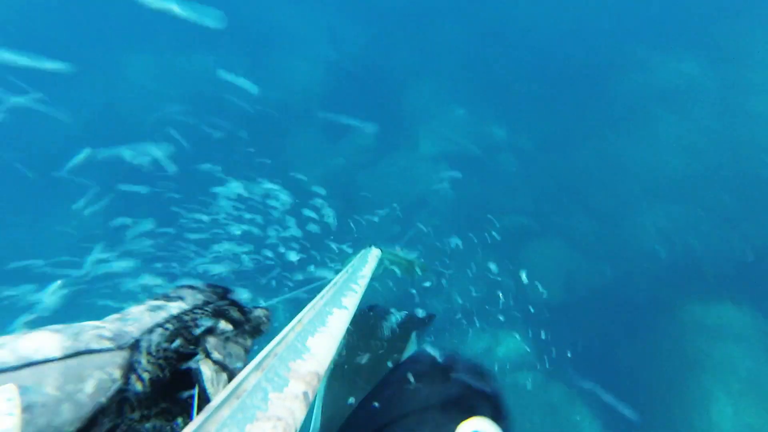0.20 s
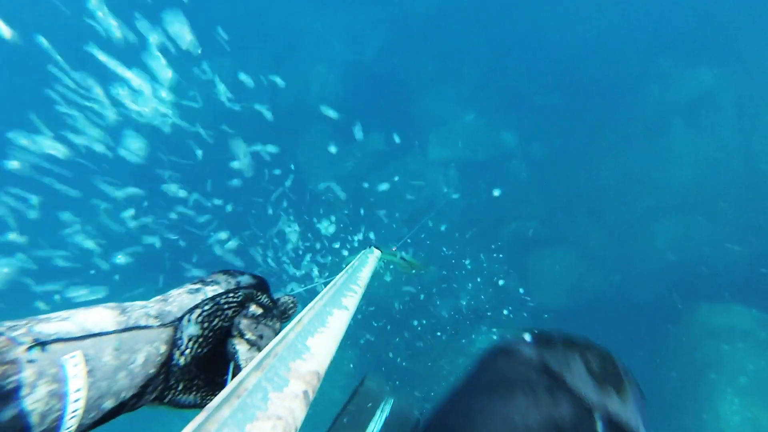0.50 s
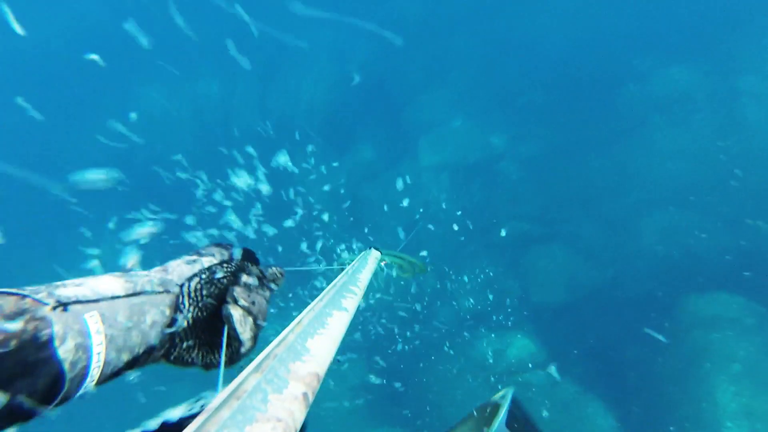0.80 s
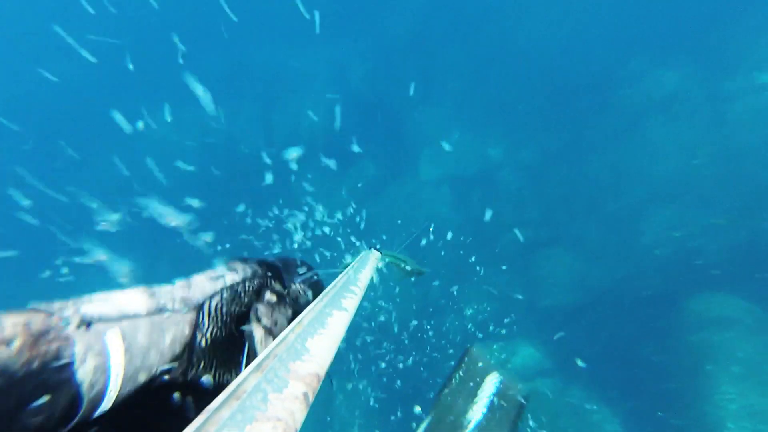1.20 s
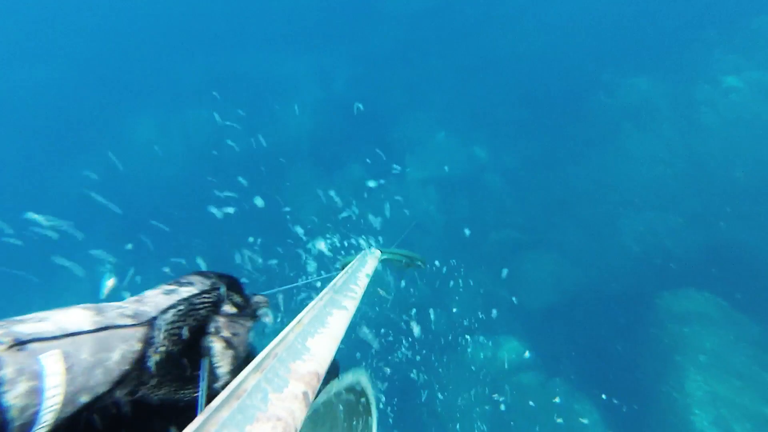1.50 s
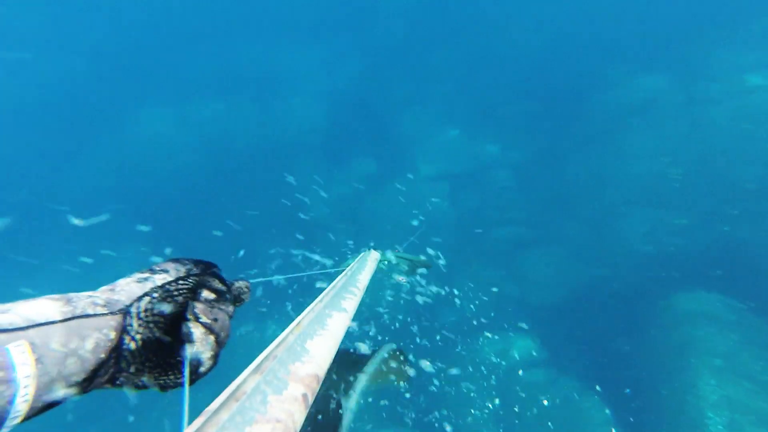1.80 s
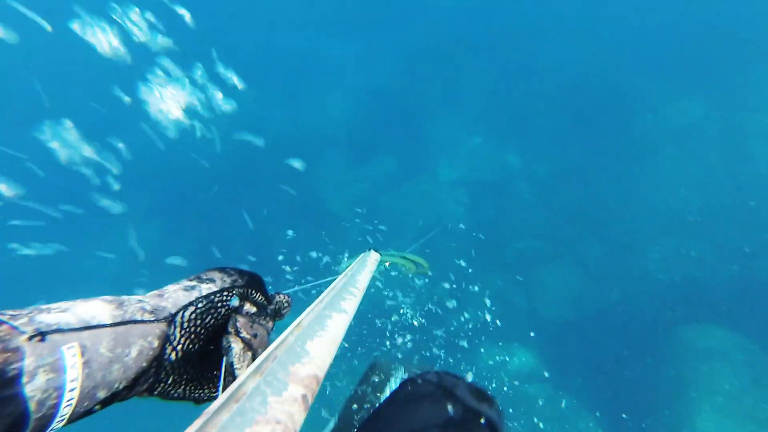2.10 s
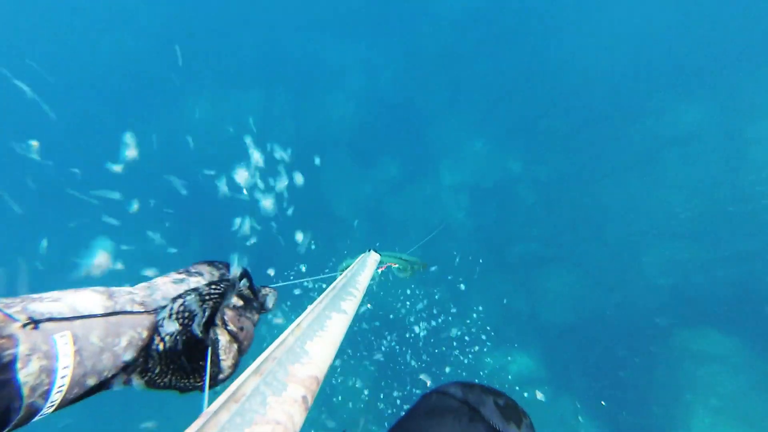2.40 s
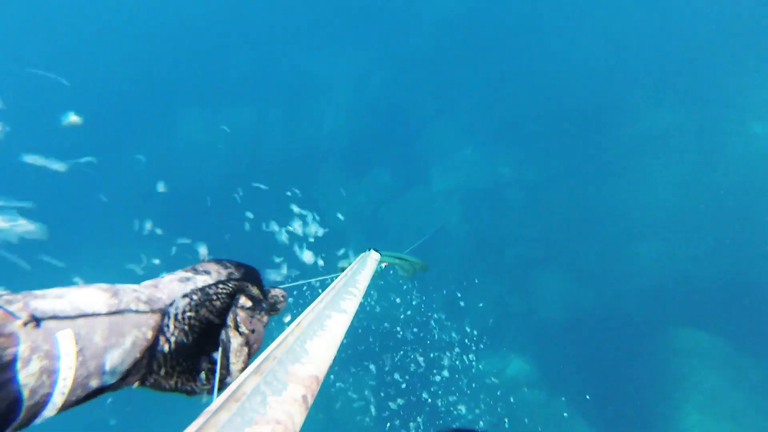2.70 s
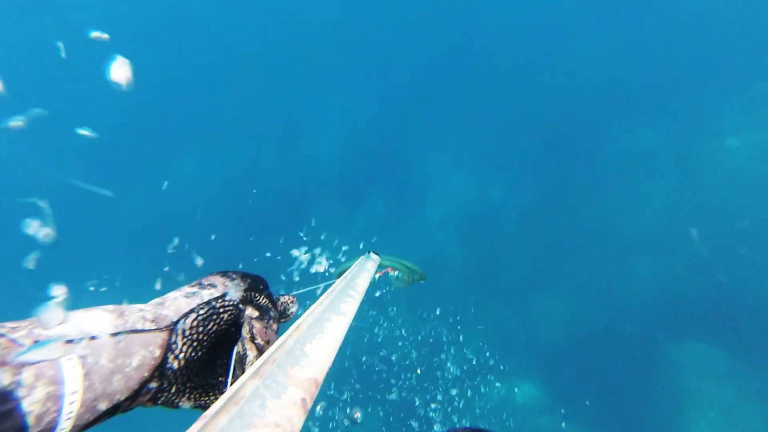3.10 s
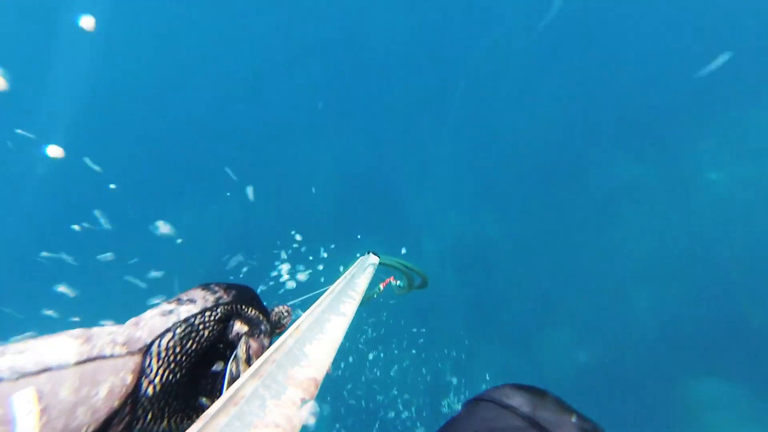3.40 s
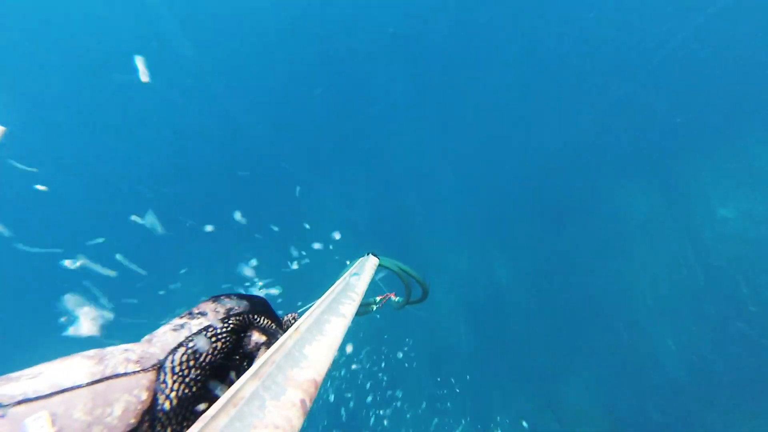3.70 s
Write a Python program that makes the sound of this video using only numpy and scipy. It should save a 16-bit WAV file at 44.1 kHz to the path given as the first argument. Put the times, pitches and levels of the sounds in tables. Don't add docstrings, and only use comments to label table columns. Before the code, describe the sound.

Diver's kicks push pulsing low water rushes past a submerged microphone, with knocks and bubbles

```python
import sys
import numpy as np
from scipy import signal
from scipy.fft import rfft, irfft
from scipy.io import wavfile
from scipy.ndimage import uniform_filter1d

SR = 44100
rng = np.random.default_rng(int(sys.argv[2]) if len(sys.argv) > 2 else 0)


def persist_wave(psi):
    counts = np.round(np.clip(psi, -1, 1) * 32767).astype(np.int16)
    wavfile.write(sys.argv[1], SR, np.atleast_2d(counts).T)


def convert_level_to_amplitude(level_db):
    exponent = np.asarray(level_db, float) / 20
    return 10 ** exponent


N = 167580
TIME = np.arange(N) / SR


def rms_one(x):
    return x / np.sqrt(np.mean(x ** 2) + 1e-20)


def at_hz(points, hz):
    table_hz, values = np.array(points).T
    return np.interp(np.log(hz), np.log(table_hz), values)


def near(s, before, after):
    first = max(int((s - before) * SR), 0)
    last = min(int((s + after) * SR), N)
    k = np.arange(first, last)
    return k, k / SR - s


def drift(rate_hz):
    r = np.exp(-80 * np.pi * rate_hz / SR)
    noise = rng.standard_normal(N // 40 + 2002)
    slow = signal.lfilter([1], [1, -2 * r, r * r], noise)[2000:]
    return np.interp(np.arange(N) / 40, np.arange(len(slow)), rms_one(slow))


def peak(x, hz, width_hz):
    r = np.exp(-np.pi * width_hz / SR)
    feedback = [1, -2 * r * np.cos(2 * np.pi * hz / SR), r * r]
    return signal.lfilter([(1 - r * r) / 2, 0, (r * r - 1) / 2], feedback, x + 1e-18)


def ring(clicks, hz, t60):
    r = convert_level_to_amplitude(-60 / (t60 * SR))
    w = 2 * np.pi * hz / SR
    return signal.lfilter([0, np.sin(w)], [1, -2 * r * np.cos(w), r * r], clicks + 1e-18)


def grains(clicks, low_hz, high_hz, cycles, tilt_db):
    dealt = rng.integers(0, 14, N)
    out = 0
    for k, hz in enumerate(np.geomspace(low_hz, high_hz, num=14)):
        rung = ring(clicks * (dealt == k), hz, cycles / hz)
        narrow = peak(rung, hz, 3.3 * hz / cycles)
        out = out + convert_level_to_amplitude(tilt_db * np.log2(hz / low_hz)) * narrow
    return out


def coloured(spectrum):
    hz = np.maximum(np.fft.rfftfreq(N, 1 / SR), 1)
    white = rng.standard_normal(N)
    return rms_one(irfft(rfft(white) * convert_level_to_amplitude(at_hz(spectrum, hz)), N))


def bands(spectrum, flow, patchy_db, lumps_db):
    out = 0
    together = np.clip(drift(30), -1.5, 1.5)
    edges = 20 * 2 ** np.arange(0, 7.6, 1 / 3)
    white = rng.standard_normal((2, N + SR))
    for k, (low, high) in enumerate(zip(edges, edges[1:])):
        hz = np.sqrt(low * high)
        band_pass = signal.butter(2, [low, high], "band", fs=SR, output="sos")
        band = signal.sosfilt(band_pass, white[k % 2])[SR:]
        lumps = lumps_db * min(hz / 250, 1) * together
        level_db = at_hz(spectrum, hz) + lumps + patchy_db * drift(22.6)
        out = out + band * convert_level_to_amplitude(level_db) * flow(hz)
    return out * np.sqrt(SR / 400)


def push(power):
    # (crest [s], rise [s], fall [s], level [dB])
    kicks = [(.1, .02, 0.057, -58), (0.268, 0.14, 0.21, -40.5), (0.731, 0.17, 0.14, -42),
             (0.871, 0.1, 0.092, -44.5), (1.19, 0.085, 0.2, -39.5), (1.59, .15, 0.23, -40),
             (2.031, 0.23, .14, -40), (2.338, .15, 0.21, -39), (2.59, 0.036, 0.037, -51),
             (2.73, 0.13, 0.15, -38), (2.9, 0.066, 0.097, -47.5), (3.09, 0.13, 0.12, -40),
             (3.249, 0.18, 0.066, -56.5), (3.465, 0.13, 0.11, -43)]
    t = np.arange(0, N + 64, 64) / SR
    force = 0
    for crest, rise, fall, db in kicks:
        part = np.interp(t, [crest - rise, crest, crest + fall], [0, 1, 0])
        force = force + convert_level_to_amplitude(db) * np.sin(np.pi / 2 * part) ** power
    return np.interp(TIME, t, force)


def hiss():
    # (frequency [Hz], level [dB])
    hiss_colour = [(700, -29), (1000, -2.5), (1800, -11.5), (3000, -6.5), (7500, -8.5), (9000, -9.5),
                   (13500, -10.5), (15500, -12)]
    return convert_level_to_amplitude(-77) * coloured(hiss_colour)


def noise_apart():
    # (frequency [Hz], level [dB])
    apart_colour = [(40, 6), (750, 0), (2700, -19), (8000, -15.5), (15000, -24.5)]
    flow = 1 + convert_level_to_amplitude(46.5) * push(1)
    return convert_level_to_amplitude(-86.5) * flow * coloured(apart_colour) * [[1], [-1]]


def whine():
    # (frequency [Hz], level [dB])
    whine_tones = [(13125, -95), (13157, -98)]
    return sum(convert_level_to_amplitude(db + 3) * np.sin(2 * np.pi * hz * TIME) for hz, db in whine_tones)


def swirl():
    # (frequency [Hz], level [dB per Hz])
    swirl_colour = [(25, 8), (120, -2.5), (300, -20.5), (800, -29), (1300, -36), (3000, -47.5)]
    # (time [s], level [dB])
    eddy_levels = [(0, -4), (.2, -2), (.55, 1), (1.05, 5.5), (1.42, 2), (1.85, 1), (2.2, 1), (2.95, 2),
                   (3.35, 1), (3.6, -4), (3.8, -5.5)]
    eddy = convert_level_to_amplitude(np.interp(TIME, *np.transpose(eddy_levels)))
    return convert_level_to_amplitude(-57) * bands(swirl_colour, lambda hz: eddy, patchy_db=3.5, lumps_db=3)


def gurgle(flow):
    born = rng.random(N) < 260 / SR
    size_db = -9.5 + 4.3 * np.minimum(rng.exponential(1, N), 2.2)
    return grains(born * flow * convert_level_to_amplitude(size_db), 259.5, 2190, cycles=11, tilt_db=-7.5)


def near_snaps():
    # (time [s], peak level [dB], frequency [Hz])
    snap_events = [(0.4034, -55, 8400), (0.6184, -51.5, 8700), (0.8243, -50, 10100), (0.859, -47.5, 8460),
                   (0.9399, -52.5, 5400), (0.987, -56, 8390), (1.0202, -54, 6450), (1.08, -59, 7990),
                   (1.1746, -51, 5540), (1.551, -48.5, 7700), (1.8859, -43.5, 6400), (2.004, -53.5, 8410),
                   (2.0129, -51.5, 4400), (2.2452, -55.5, 4600), (2.2753, -53.5, 9980),
                   (2.4606, -54.5, 8030), (2.5813, -50, 7680), (2.644, -61, 6710), (2.6593, -53.5, 6600),
                   (2.6827, -51, 7700), (2.728, -41, 5010), (2.7922, -42, 4800), (2.8131, -49, 8200),
                   (2.8333, -53.5, 7820), (2.9673, -52.5, 8100), (3.048, -56, 4700), (3.0675, -54.5, 6440),
                   (3.1084, -54, 6220), (3.1243, -47.5, 7620), (3.153, -55.5, 4470), (3.273, -54.5, 9950),
                   (3.3429, -58, 8100), (3.4163, -60, 8050), (3.491, -55, 8060), (3.54, -57.5, 8090),
                   (3.6432, -61, 9780)]
    out = np.zeros(N)
    puff = np.exp(-np.arange(900) / (.0014 * SR))
    for s, db, hz in snap_events:
        burst = rng.standard_normal(900) * puff
        octaves = .4 * rng.standard_normal(4) * [0, 1, 1, 1]
        pitches = np.clip(hz * 2 ** octaves, 2800, 10000)
        snap = sum(ring(burst, f, 8 / f) for f in pitches)
        start = int(s * SR)
        out[start:start + 900] += convert_level_to_amplitude(db + 1.5) * snap / np.abs(snap).max()
    return out


def crackle(flow):
    # (frequency [Hz], width [Hz], level [dB])
    shell_modes = [(4950, 300, -1), (6430, 600, -1), (7930, 900, 1), (10000, 900, -4), (12200, 900, -12)]
    chance = 320 * convert_level_to_amplitude(6 * drift(6)) / SR
    far_db = -73 + 3.2 * np.minimum(rng.exponential(1, N), 4)
    far = (rng.random(N) < chance) * convert_level_to_amplitude(far_db)
    out = near_snaps() + grains(far, 1730, 13000, cycles=14, tilt_db=2.33)
    fizz = convert_level_to_amplitude(-27 + 3.0 * drift(57)) * flow * rng.standard_normal(N)
    drive = .5 * out + fizz
    shell = drive / 8
    for k, (hz, width_hz, db) in enumerate(shell_modes):
        shell = shell + (-1) ** k * convert_level_to_amplitude(db) * peak(drive, hz, width_hz)
    high_pass = signal.butter(3, 2500, "high", fs=SR, output="sos")
    return signal.sosfilt(high_pass, out + shell)


def rush():
    # (frequency [Hz], level [dB per Hz])
    rush_colour = [(25, -0.5), (70, -0.5), (200, -8), (800, -15), (1000, -25.5), (1400, -30.5),
                   (2200, -37.5), (2900, -34)]
    # (frequency [Hz], power [1])
    steepness = [(30, 0.71), (300, 0.81), (800, 1.77), (2500, 4)]
    return convert_level_to_amplitude(-3) * bands(rush_colour, lambda hz: push(at_hz(steepness, hz)), patchy_db=3.5, lumps_db=3.0)


def shaft(drive):
    # (frequency [Hz], width [Hz], level [dB])
    shaft_modes = [(155.8, 12.7, 7), (321.5, 32, 3.5), (564, 65, 2), (740, 24.7, 7), (758, 23, -2),
                   (1713, 130, 9.5), (2050, 290, -3), (2273, 32, 7.5)]
    body = drive + sum(convert_level_to_amplitude(db) * peak(drive, hz, width_hz) for hz, width_hz, db in shaft_modes)
    wall = signal.cheby1(5, 1, 2394, fs=SR, output="sos")
    return signal.sosfilt(wall, body)


def knocks():
    # (time [s], peak level [dB], contact frequency [Hz])
    contacts = [(0.0909, -31.5, 430), (0.2793, -13, 2540), (0.957, -39, 900), (1.429, -52, 3300),
                (1.138, -25.5, 780), (2.775, -21, 960), (2.646, -40, 1450)]
    # (frequency [Hz], level [dB], time to fall 60 dB [s])
    housing_modes = [(171, -15, 0.035), (356, -10.5, 0.054), (490, -21, 0.09), (677, -3.5, 0.024),
                     (900, -15.5, 0.0077), (2000, -9.5, 0.011), (3560, -22.5, 0.011)]
    hits = np.zeros(N)
    for s, db, hz in contacts:
        touch = np.hanning(int(SR / hz) + 2)
        start = int(s * SR)
        hits[start:start + len(touch)] -= convert_level_to_amplitude(db) * touch / touch.sum()
    return sum(convert_level_to_amplitude(db) * ring(hits, hz, t60) for hz, db, t60 in housing_modes)


def heave():
    # (centre [s], level [dB], length [s])
    heave_events = [(0.321, -37, 0.23), (0.788, -43, .16), (1.238, -34.5, .15), (1.62, -38, .14),
                    (2.101, -40, 0.2), (2.38, -42, 0.26), (2.8, -42.5, 0.21), (3.142, -38.5, .16),
                    (3.5, -45, .12)]
    out = np.zeros(N)
    for s, db, length in heave_events:
        swell = np.exp(-8 * ((TIME - s) / length) ** 2)
        out += convert_level_to_amplitude(db + 3) * swell * np.sin(2 * np.pi * 18.4 * (TIME - s))
    return out


def locks():
    # (centre [s], length [s], level [dB], frequency [Hz], glide [Hz per s])
    lock_events = [(0.236, 0.022, -42.5, 793, 2000), (0.317, 0.034, -36.5, 780, -3000),
                   (.205, 0.027, -44, 323, 3000), (.25, 0.063, -57, 2000, 6000), (.69, .06, -43, 510, 5000),
                   (.805, 0.048, -42, 450, -7000), (0.654, .08, -41, 320, 0),
                   (0.689, 0.064, -37, 150, -500), (.87, 0.094, -39, 141, -300),
                   (1.16, 0.046, -38, 320.6, 500), (1.3, 0.11, -47.5, 750, -400),
                   (1.685, .08, -36.5, 155, 0), (1.715, 0.026, -42.5, 748, -1000),
                   (1.635, 0.033, -42, 520, -5000), (2.2, .06, -43, 560, 6000), (1.9, .09, -42.5, 161, 0),
                   (2.305, 0.029, -40, 760, 1000), (1.93, 0.073, -42, 310, 0),
                   (3.085, 0.028, -51, 1700, 2000), (3.405, 0.029, -41, 154, 0),
                   (.775, 0.048, -36, 777, -2000), (0.881, 0.068, -42.5, 767, -800),
                   (0.921, 0.04, -40.5, 320, 7), (1.252, 0.045, -36, 773, -300),
                   (1.615, 0.037, -31, 739, -2500), (1.949, 0.059, -38.5, 725, 502),
                   (2.062, 0.044, -30.5, 740, -2500), (2.372, 0.015, -30.5, 740, -1500),
                   (2.678, 0.052, -33, 600, -1000), (3.12, 0.02, -31, 737, -2500),
                   (3.21, 0.064, -53, 460, 1000), (3.275, 0.056, -52, 540, 1000),
                   (3.53, 0.048, -42, 320.4, -5), (3.46, .11, -47.5, 600, 100),
                   (0.727, 0.041, -50, 1717, 3000), (1.55, 0.043, -33, 149.5, 6),
                   (1.31, 0.11, -39.5, 159.7, -3)]
    out = np.zeros(N)
    rough = convert_level_to_amplitude(1.5 * np.clip(drift(45), -2, 1))
    waver = .3 * drift(35)
    for s, length, db, hz, glide in lock_events:
        k, t = near(s, length, 1.2 * length)
        side = np.where(t < 0, .8 * length, 1.2 * length)
        swell = np.exp(-8 * (t / side) ** 2)
        phase = 2 * np.pi * (hz + glide * t / 2) * t + waver[k]
        out[k] += convert_level_to_amplitude(db + 1.5) * swell * rough[k] * np.sin(phase)
    return out


def whistle():
    # (multiple of the pitch [1], level [dB])
    partials = [(.47, -8), (1.0, -2.5), (2.1, -19)]
    # (crest [s], top frequency [Hz], level [dB], climb [Hz per s], fall [Hz per s])
    arches = [(.27, 1050, -50.5, 10030, 5480), (.74, 900, -49, 7484, 6040), (1.245, 821.6, -47, 7980, 8940),
              (1.585, 923.6, -48, 8040, 7030), (2.03, 844, -46.5, 6983, 8000),
              (2.33, 1000, -53.5, 10060, 6090), (3.095, 843, -51, 8980, 9270)]
    round_s, lowest_hz = .012, 276.2
    out = np.zeros(N)
    for multiple, db in partials:
        waver = 1 + .025 * drift(30.0)
        flutter = convert_level_to_amplitude(db + 3.5 * np.minimum(drift(28), 1))
        for crest, top_hz, level_db, climb, fall in arches:
            k, t = near(crest, .2, .2)
            slope = np.where(t < 0, climb, fall)
            hz = top_hz - slope * (np.hypot(t, round_s) - round_s)
            phase = 2 * np.pi * np.cumsum(multiple * waver[k] * np.maximum(hz, lowest_hz)) / SR
            fade = np.clip(hz / lowest_hz - 1, 0, 1)
            out[k] += convert_level_to_amplitude(level_db) * fade * flutter[k] * np.sin(phase)
    return out


def pings():
    # (time [s], peak level [dB], frequency [Hz], time to fall 60 dB [s])
    bubbles = [(3.205, -50, 1000, 0.033), (3.213, -52, 1500, 0.033), (3.22, -53, 1750, 0.033),
               (.453, -54, 1180, 0.059), (0.871, -42, 2460, 0.021), (1.385, -54, 1160, 0.036),
               (2.182, -59, 1240, 0.086), (2.829, -48, 1055, 0.11), (3.255, -40.5, 1330, 0.023),
               (3.259, -46.5, 1800, 0.032), (3.274, -49, 1210, 0.061), (3.598, -52.5, 1226, 0.065),
               (3.69, -55, 1890, 0.033), (3.753, -50, 1275, 0.11)]
    out = np.zeros(N)
    rough = convert_level_to_amplitude(2.5 * np.minimum(drift(78), 1) - 0.5)
    waver = 0.47 * drift(60)
    for s, db, hz, t60 in bubbles:
        k, t = near(s, 0, t60)
        attack = 1 - np.exp(-np.abs(t) / .005)
        phase = 2 * np.pi * hz * t * (1 + .6 * t) + waver[k]
        out[k] += rough[k] * convert_level_to_amplitude(db - 60 * t / t60) * attack * np.sin(phase)
    return out


def ragged_top(x):
    # (lower edge [Hz], share of the time kept [1])
    ragged_bands = [(13600, .93), (14100, .8), (14600, .55), (15100, .2), (15500, .03)]
    spectrum, hz = rfft(x), np.fft.rfftfreq(N, 1 / SR)
    block = np.arange(N) // 1024 * 1024
    spare = drift(7)[block]
    edges = [edge for edge, _ in ragged_bands] + [SR]
    out = irfft(spectrum * (hz < edges[0]), N)
    for (low, kept), high in zip(ragged_bands, edges[1:]):
        own = spare + .4 * drift(15)[block]
        is_open = 1. * (own > np.quantile(own, 1 - kept))
        gate = uniform_filter1d(is_open, size=200)
        out = out + gate * irfft(spectrum * ((hz >= low) & (hz < high)), N)
    return out


def scene():
    torn_air = gurgle(convert_level_to_amplitude(-66.5) + push(1.96))
    through_shaft = shaft(swirl() + torn_air + rush() + whistle())
    direct = crackle(push(3.6)) + knocks() + heave() + locks() + pings()
    return through_shaft + direct + hiss() + whine() + noise_apart()


def low_pass(x):
    return signal.sosfilt(signal.butter(12, 15710, fs=SR, output="sos"), x)


def record(dry):
    mix = ragged_top(dry)
    return low_pass(mix)


dry = scene()
out = record(dry)
persist_wave(out)
```